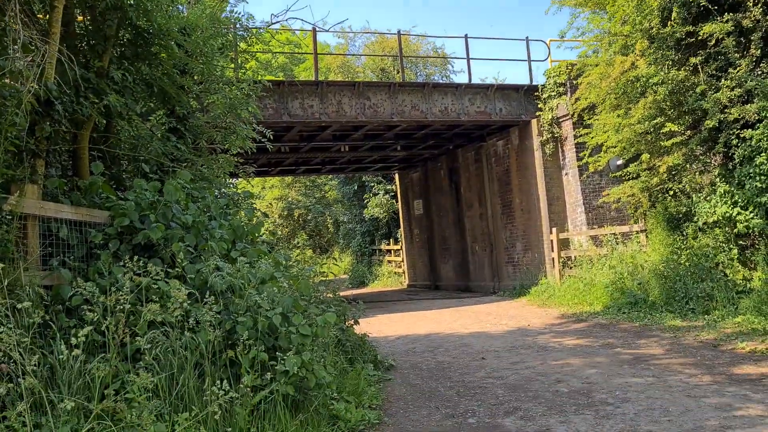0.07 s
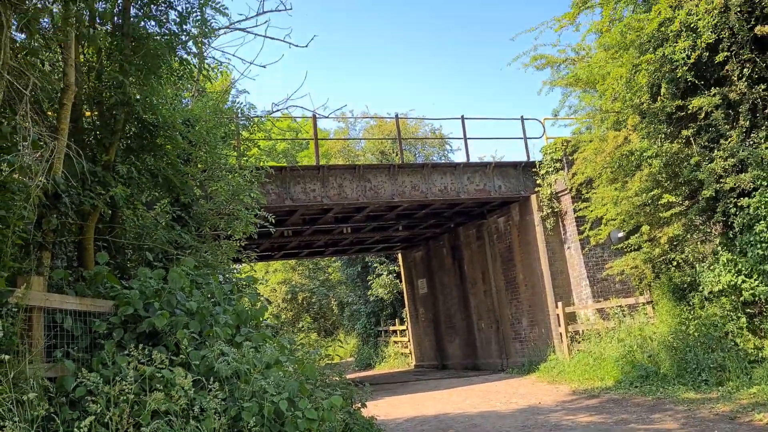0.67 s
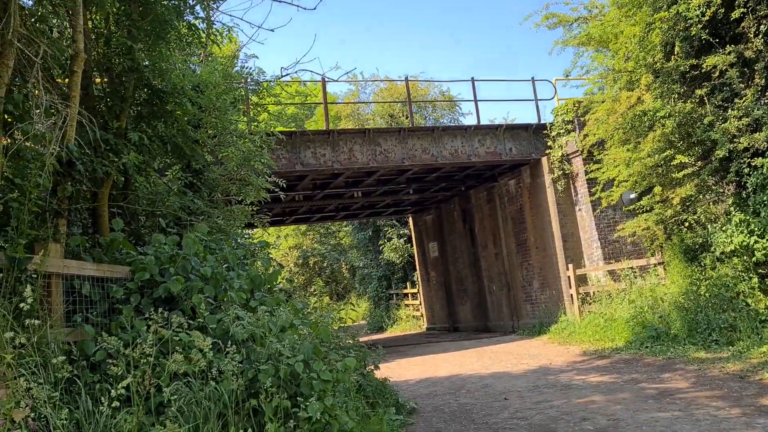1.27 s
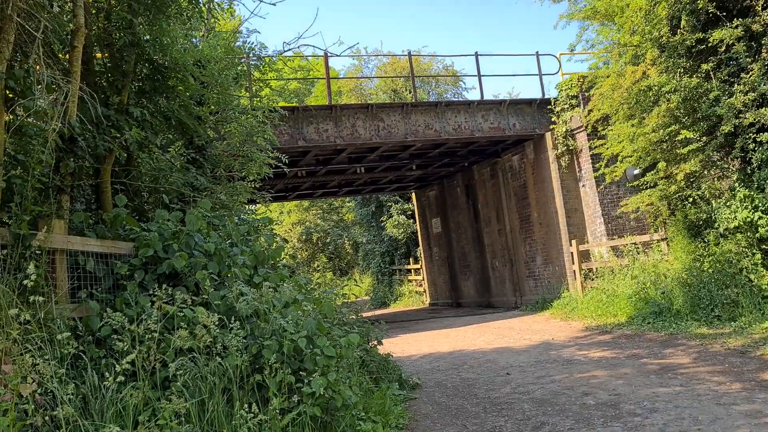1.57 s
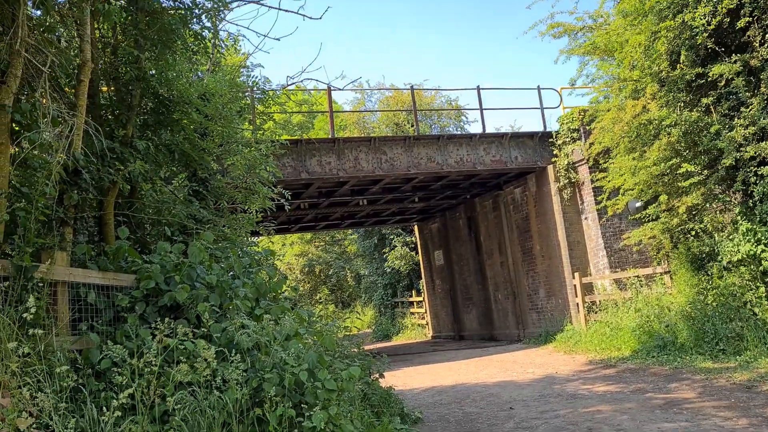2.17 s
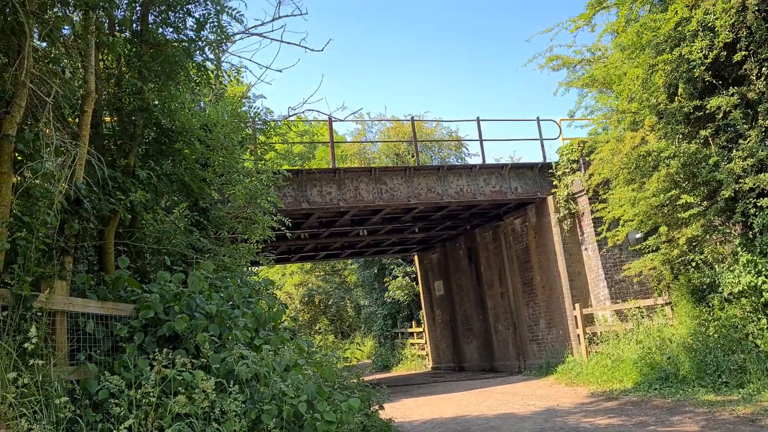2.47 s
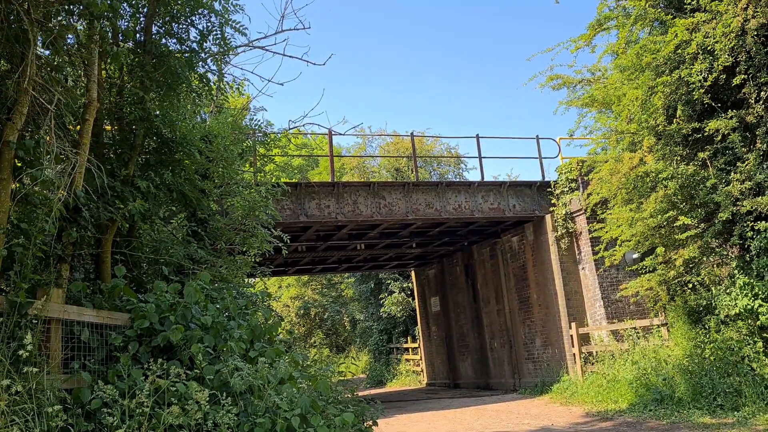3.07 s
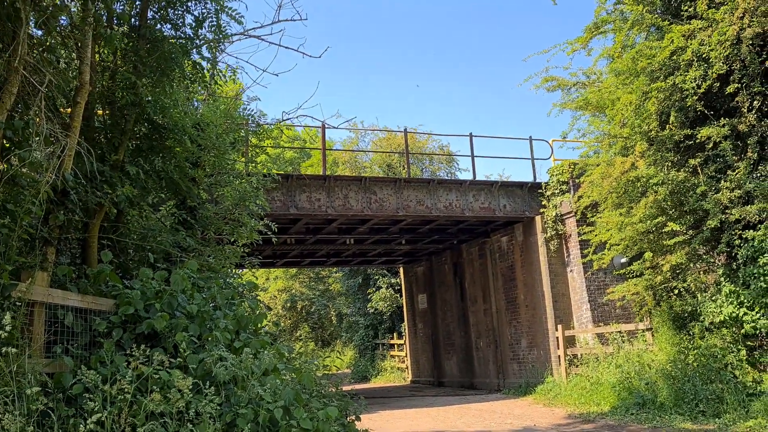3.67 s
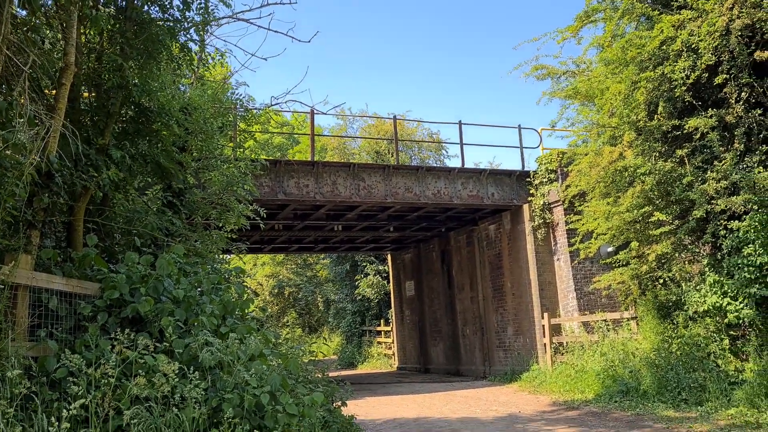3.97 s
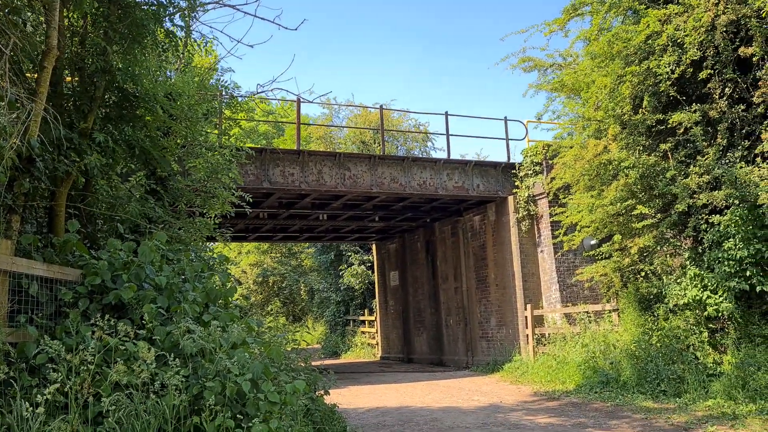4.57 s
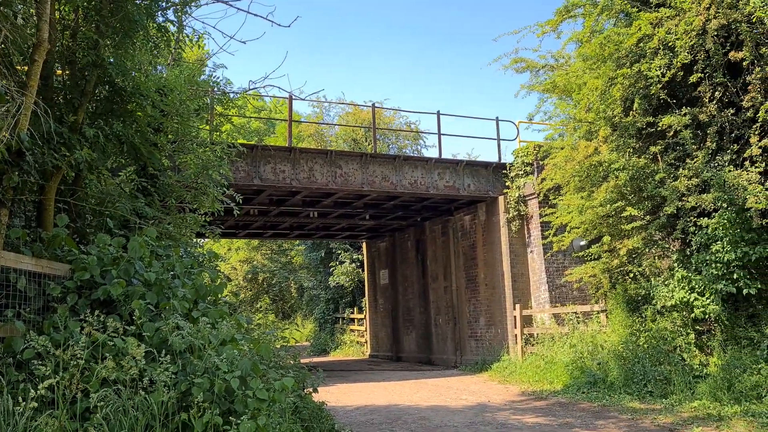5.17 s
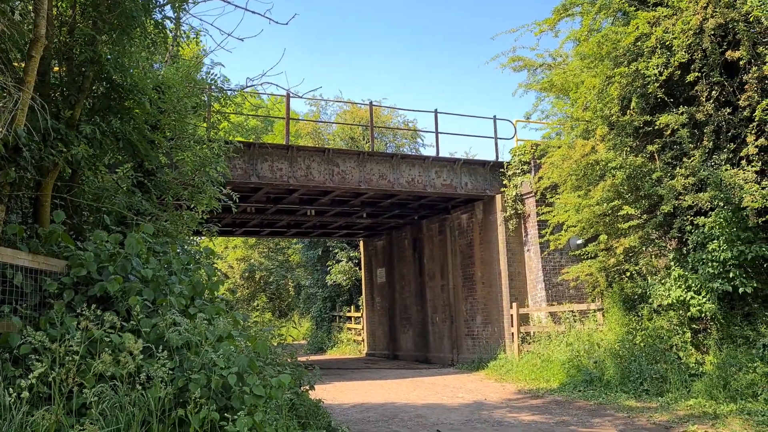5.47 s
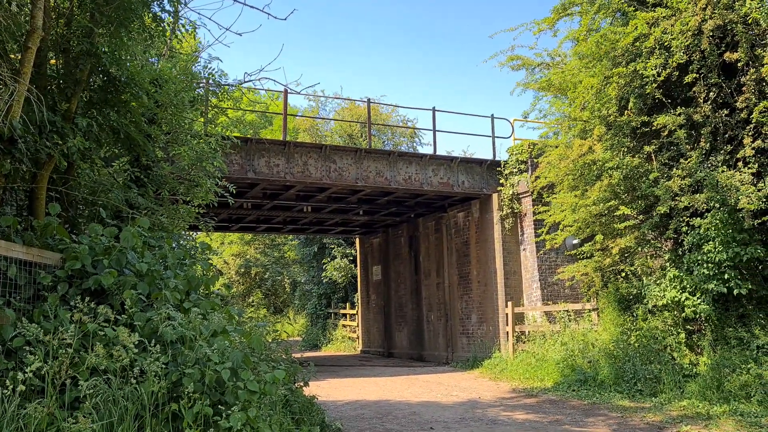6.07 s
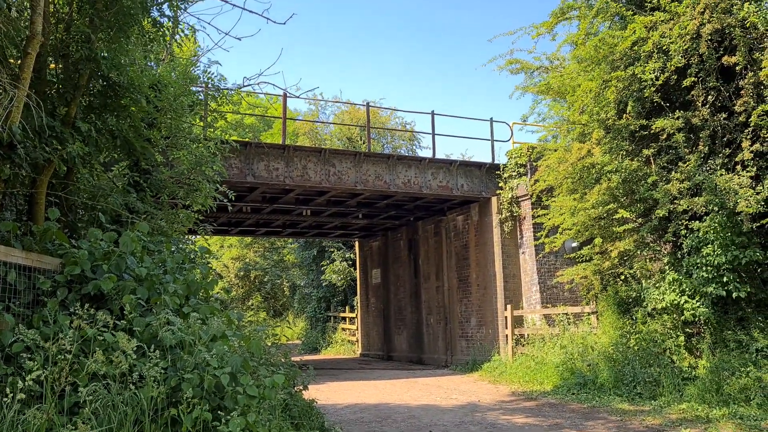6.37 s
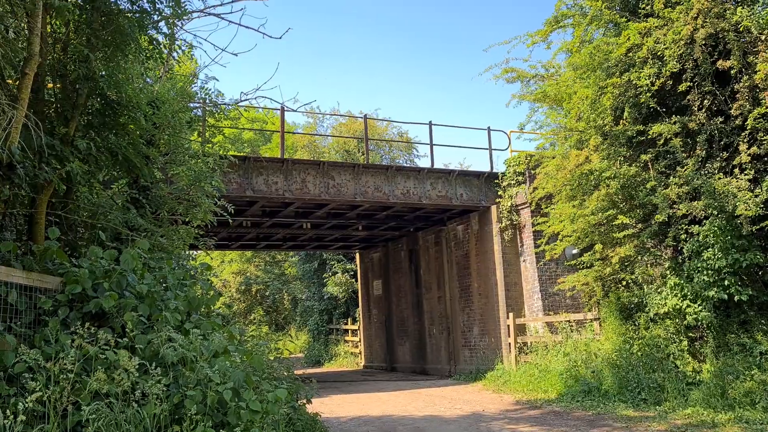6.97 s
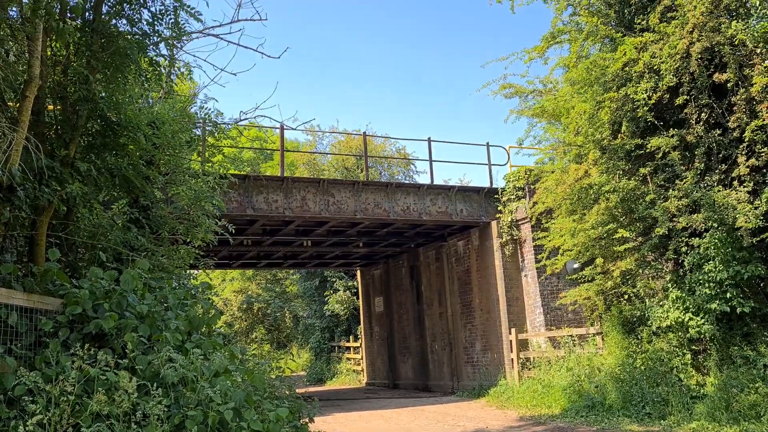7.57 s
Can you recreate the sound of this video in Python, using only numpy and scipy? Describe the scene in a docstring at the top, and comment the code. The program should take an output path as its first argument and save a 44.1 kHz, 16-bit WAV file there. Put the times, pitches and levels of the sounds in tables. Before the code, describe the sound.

A blackbird warbles and a wren answers with thin whistles and a trill, over distant traffic rumble and a light breeze.

```python
"""Birdsong on a country path

Two closely spaced microphones stand near a railway bridge. A blackbird in a tree on the right warbles
one phrase; a wren answers from the hedge with thin whistles, a loud trill and a high last note.
Another bird sings far off. Trunks, leaves and the bridge scatter the song. Distant traffic rumbles
under a soft rush of air, a light breeze buffets the microphones and grit shifts under a shoe."""
import sys
import numpy as np
from scipy import signal
from scipy.fft import rfft, irfft, next_fast_len
from scipy.io import wavfile

SR = 44100
rng = np.random.default_rng(int(sys.argv[2]) if len(sys.argv) > 2 else 0)


def digitize_waveform(pressure):
    """Quantize a signal to 16-bit integers and store it at the path in sys.argv[1].

    Rows of a 2-D input are taken as channels; values are limited to [-1, 1].
    """
    field = np.atleast_2d(pressure).T
    bounded = np.clip(field, -1, 1)
    quanta = np.round(bounded * 32767).astype(np.int16)
    wavfile.write(sys.argv[1], SR, quanta)


N = 344862
TIME = np.arange(N) / SR


def from_db(db):
    """Decibels to gain."""
    return 10 ** (np.asarray(db) / 20)


def rms_one(x):
    """Scale to unit power."""
    return x / np.sqrt(np.mean(x ** 2) + 1e-20)


def at_hz(points, hz, outside=None):
    """Read a table on a log-frequency axis."""
    known, values = np.transpose(points)
    return np.interp(np.log(hz), np.log(known), values, left=outside, right=outside)


def over_time(points):
    """Join (time, value) points with straight lines."""
    return np.interp(TIME, *np.transpose(points))


def bump(at_s, width_s):
    """A smooth rise and fall of height 1 around a moment."""
    return np.exp(-((TIME - at_s) / width_s) ** 2)


def rolloff(x, hz, kind="low", order=2):
    """A gentle low-pass or high-pass."""
    return signal.sosfilt(signal.butter(order, hz, kind, fs=SR, output="sos"), x)


def coloured(spectrum, channels=2):
    """Unrelated noises with the given spectrum and nothing beyond its ends."""
    hz = np.maximum(np.fft.rfftfreq(N, 1 / SR), 1)
    gain = from_db(at_hz(spectrum, hz, outside=-200))
    return rms_one(irfft(rfft(rng.standard_normal((channels, N))) * gain, N))


def drift(rate_hz):
    """Smooth random wandering of spread 1."""
    return rms_one(rolloff(rng.standard_normal(N), rate_hz))


def from_right(x, lag_ms, right_db):
    """A sound from the right reaches the left microphone later, and weaker by right_db."""
    size = next_fast_len(N + 100)
    khz = np.fft.rfftfreq(size, 1000 / SR)
    late = irfft(rfft(x, size) * np.exp(-2j * np.pi * khz * lag_ms), size)[:N]
    return np.array([late, x]) * rms_one(from_db([[0], [right_db]]))


def traffic():
    """Far traffic rumbles from the right and faintly all round, with one slow swell and brief surges."""
    # the rumble's spectrum: (frequency [Hz], density [dB])
    spectrum = [(12, -38.5), (20, -10.5), (70, 4), (90, 0), (135, -15), (170, -25), (220, -41), (370, -120)]
    # its slow swell and ebb: (time [s], level [dB])
    swell = [(0, -54), (.7, -55.5), (3.4, -53.5), (4.3, -51), (5.4, -49), (6.6, -55), (7.82, -55.5)]
    # surges on top: (time [s], rise [dB])
    surges = [(.04, 5), (.24, 6), (3.61, 2.5), (3.72, 4.5), (4.14, 9)]
    level_db = over_time(swell) + sum(db * bump(at_s, width_s=.048) for at_s, db in surges)
    direct = from_right(coloured(spectrum, channels=1)[0], lag_ms=.22, right_db=1.4)
    diffuse = from_db(-16.5) * coloured(spectrum)
    return from_db(level_db) * rms_one(direct + diffuse)


def rush():
    """Leaves all round and a far road on the right; only long waves reach both microphones alike."""
    # the rush's spectrum: (frequency [Hz], density [dB])
    spectrum = [(76, 6), (130, -0.5), (173, -3), (216, -3.5), (260, -4.5), (397, -2.5), (637, -6),
                (1020, -5.5), (2270, -17), (3700, -18), (4610, -21), (4850, -25.5), (5280, -25),
                (6690, -23.5), (7400, -27.5), (9620, -59.5), (16300, -120)]
    # its lean across the pair: (frequency [Hz], left minus right [dB])
    balance = [(60, -4.5), (100, 0), (170, -2.5), (290, -1), (500, -1.5), (840, -3), (1430, -2.5),
               (2430, -6.5), (4130, -9), (7000, -5.5)]
    # its almost steady strength: (time [s], level [dB])
    level = [(0, -54), (4.3, -52.5), (7.82, -54.5)]
    spacing_ms, road_db, road_corner_hz = .43, -1, 1620
    hz = np.maximum(np.fft.rfftfreq(N, 1 / SR), 1)
    alike = np.sinc(2 * hz * spacing_ms / 1000)
    mid, side = rfft(coloured(spectrum))
    leaves = np.sqrt((1 + alike) / 2) * mid + np.sqrt((1 - alike) / 2) * side * [[1], [-1]]
    road = rfft(from_right(coloured(spectrum, channels=1)[0], spacing_ms, right_db=0))
    road_gain = from_db(road_db) / np.sqrt(1 + (hz / road_corner_hz) ** 2)
    both = (leaves + road_gain * road) / np.sqrt(1 + road_gain ** 2)
    lean = from_db(at_hz(balance, hz) * [[.5], [-.5]])
    return from_db(over_time(level)) * rms_one(irfft(both * lean, N))


def breeze():
    """Light air buffets each microphone on its own."""
    # the breeze freshens midway: (time [s], level [dB])
    level = [(0, -67), (2.7, -64.5), (4.8, -60), (6.7, -59.5), (7.82, -61)]
    return from_db(over_time(level)) * coloured([(15, -7), (30, -7.5), (60, -22.5), (150, -24)])


def hiss():
    """A faint high hiss, a little stronger on the right."""
    # the hiss's spectrum: (frequency [Hz], density [dB])
    spectrum = [(7000, -18), (7700, -10), (8700, -4.5), (9800, 2), (13000, 1), (16500, -6)]
    return from_db([[-82.2], [-79]]) * coloured(spectrum)


def scuffs():
    """Grit shifts under a shoe: a brief scrape and two dull ticks."""
    # shifts of the grit: (time [s], half length [s], level before dulling [dB], dull above [Hz])
    shifts = [(.342, .020, -57, 15000), (1.3045, .0016, -47, 3000), (3.081, .001, -51, 6000)]
    grit = coloured([(300, -2), (1200, 0), (4000, -6), (7400, -14), (8200, -27), (15000, -27)])
    grit *= from_db(2 * drift(300))
    return sum(from_db(db) * bump(at_s, half_s) * rolloff(grit, top_hz, order=1)
               for at_s, half_s, db, top_hz in shifts)


def sing(notes, waver, rasp_depth, rasp_hz, rise_s, fall_s, second_db, third_db):
    """Each note is a near-pure whistle through three pitches; fast flutter of the syrinx makes it rasp."""
    song = np.zeros(N)
    wander, flutter = drift(79), drift(rasp_hz)
    for start, length, first, middle, last, db, rasp in notes:
        at = np.flatnonzero((TIME >= start) & (TIME < start + length))
        progress = (TIME[at] - start) / length
        glide_hz = np.polyval(np.polyfit([0, .5, 1], [first, middle, last], 2), progress)
        pitch_hz = glide_hz * (1 + waver * wander[at] + rasp_depth * rasp * flutter[at])
        phase = 2 * np.pi * np.cumsum(pitch_hz) / SR
        # air pressure builds and drops
        rise = np.clip(progress / min(rise_s / length, .5), 0, 1)
        fall = np.clip((1 - progress) / min(fall_s / length, 1 / 3), 0, 1)
        envelope = rise * np.sin(np.pi / 2 * fall) ** 2
        amplitude = np.sqrt(2) * from_db(db + 2 * rasp * flutter[at])
        # the octave grows as the pitch is pushed up
        second = from_db(second_db) * (glide_hz / 6000) ** 3 * np.sin(2 * phase)
        third = from_db(third_db) * np.sin(3 * phase)
        song[at] += amplitude * envelope * (np.sin(phase) + second + third)
    return song


def scatter(db, t60_s):
    """A second of dense reflections at each microphone, dying by 60 dB in t60_s."""
    t = TIME[:SR]
    envelope = from_db(-60 * t / t60_s) * (1 - np.exp(-t / .0013))
    return from_db(db) * rms_one(rng.standard_normal((2, SR)) * envelope) / np.sqrt(SR)


def woodland(song, echoes, foliage, trees, shade_hz, scatter_hz, lag_ms, right_db, echo_right_db):
    """Direct song, distinct echoes, quick scatter from foliage and a longer tail from the trees beyond."""
    # leaves take short waves out of the direct path and scatter them
    direct = from_right(rolloff(song, shade_hz), lag_ms, right_db)
    response = trees + rolloff(foliage, scatter_hz, "high")
    for delay_s, db in echoes:
        for side in range(2):
            response[side, int((delay_s + rng.uniform(0, .001)) * SR)] += from_db(db)
    reflected = signal.fftconvolve(song[None], response, axes=1)[:, :N]
    return direct + reflected * rms_one(from_db([[0], [echo_right_db]]))


def far_bird():
    """Distant song reaches the microphones largely as scattered sound."""
    # far notes: (start [s], length [s], first [Hz], middle [Hz], last [Hz], effort [dB], rasp [0-1])
    notes = [ (.77, 0.14, 5100, 4950, 5020, -71, .1), (1.90, 0.11, 2323, 2290, 2180, -66, .23),
             (4.86, 0.11, 4880, 4980, 4990, -68.5, .06), (5.62, 0.081, 1807, 1730, 1780, -67, .6),
             (5.76, .30, 2095, 2027, 1995, -71.5, 0.79), (6.42, 0.16, 2174, 2080, 2020, -62.5, .46),
             (6.44, 0.11, 1800, 1785, 1680, -64, .84), (6.77, 0.12, 2280, 2196, 2270, -63, .31),
             (6.91, 0.037, 2530, 2560, 2500, -53, .1), (6.94, 0.1, 2267, 2324, 2365, -56, 0.11),
             (7.04, 0.103, 2350, 2317, 2237, -51.5, .13), (7.30, .089, 2750, 2373, 1760, -60, 1),
             (7.39, 0.069, 2430, 2624, 2580, -52, .5)]
    song = sing(notes, waver=.0044, rasp_depth=.054, rasp_hz=199,
                rise_s=.019, fall_s=.0091, second_db=-38, third_db=-57)
    return from_db(-2) * woodland(
        song, echoes=[], foliage=scatter(db=2.5, t60_s=.18), trees=scatter(db=4, t60_s=.74),
        shade_hz=9050, scatter_hz=1200, lag_ms=.41, right_db=5, echo_right_db=4)


def wren_trill():
    """One syllable eight times in strict time, swelling a little and sinking slightly in pitch."""
    # the syllable's soft lead-in, top pip and steep fall:
    # (offset [s], length [s], first [Hz], middle [Hz], last [Hz], relative effort [dB], rasp [0-1])
    syllable = [(-.034, .027, 4436, 4620, 4360, -15.5, 1), (-.005, 0.014, 5650, 5850, 5660, 1.5, 0.05),
                (.012, .026, 5850, 4590, 4086, -1.06, 0.28)]
    start_s, period_s, swell_s, sag_per_s = 6.6262, .11906, .19, .031
    notes = []
    for elapsed in np.arange(8) * period_s:
        effort_db = -28.5 - 2 * np.exp(-elapsed / swell_s)
        for offset, length, *pitches, db, rasp in syllable:
            tuning = 1 - sag_per_s * elapsed + rng.normal(0, .0074, size=3)
            notes.append((start_s + elapsed + offset, length, *(pitches * tuning), effort_db + db, rasp))
    return sing(notes, waver=.007, rasp_depth=.04, rasp_hz=400,
                rise_s=.004, fall_s=.004, second_db=-42, third_db=-42)


def wren():
    """Thin whistles, a trill and a high last note from deep in the hedge."""
    # single notes: (start [s], length [s], first [Hz], middle [Hz], last [Hz], effort [dB], rasp [0-1])
    notes = [ (5.58, 0.057, 5250, 5050, 4900, -68, .3), (5.688, 0.027, 4000, 4250, 4500, -53, .3),
             (5.768, 0.032, 6260, 5450, 5100, -60.5, .9), (5.825, .029, 5230, 4740, 4230, -54, 1),
             (5.938, 0.11, 6090, 6630, 6400, -46.5, .15), (6.050, 0.041, 5620, 5030, 4250, -55, 1),
             (6.080, 0.017, 4540, 4220, 4320, -45, .08), (6.162, 0.095, 6090, 6660, 6590, -40.5, 0.2),
             (6.302, 0.147, 5330, 4943, 4860, -42.5, 0.047), (6.462, 0.1, 5750, 6240, 6160, -36, .05),
             (7.555, .175, 7260, 7310, 7260, -35, 0.041)]
    # echoes off the bridge and trunks: (delay [s], gain [dB])
    echoes = [(.0105, -6), (.029, -9), (.046, -14)]
    whistles = sing(notes, waver=.0023, rasp_depth=.03, rasp_hz=245,
                    rise_s=.012, fall_s=.025, second_db=-42, third_db=-69)
    song = whistles + wren_trill()
    return from_db(-7) * woodland(
        song, echoes, foliage=scatter(db=1.5, t60_s=.31), trees=scatter(db=-2.5, t60_s=.51),
        shade_hz=12000, scatter_hz=1990, lag_ms=.39, right_db=1.5, echo_right_db=3.3)


def blackbird():
    """Fluty notes from a tree on the right; the bird's throat favours the middle of its range."""
    # the song: (start [s], length [s], first [Hz], middle [Hz], last [Hz], effort [dB], rasp [0-1])
    notes = [ (1.344, 0.017, 2500, 3090, 3100, -43.5, 0), (1.392, 0.063, 4170, 4080, 3960, -50.5, 0.44),
             (1.511, 0.037, 2450, 2686, 2720, -38.5, 0.02), (1.597, 0.094, 3140, 2947, 2785, -45.5, 0.2),
             (1.820, 0.045, 4430, 3880, 3140, -45.5, .34), (1.932, 0.049, 4700, 4185, 3680, -42, .2),
             (2.125, 0.028, 3064, 3490, 3900, -50.5, .4), (2.153, 0.014, 4120, 4150, 4200, -37, 0.45),
             (2.212, .026, 4500, 4100, 3400, -41.5, .26), (2.245, .048, 3410, 3304, 3120, -41.5, 0.74),
             (2.388, 0.015, 6300, 5860, 5360, -40, 1), (2.458, .014, 5600, 4900, 4800, -41.5, 0.6),
             (2.572, .070, 3270, 2646, 2880, -40, 0.58), (2.668, 0.05, 2840, 3400, 3450, -38.5, 0),
             (2.932, 0.022, 6250, 4800, 4270, -37.5, 0.9), (2.948, 0.069, 4400, 3670, 3640, -41, 0.65),
             (3.015, .082, 3600, 3920, 3640, -48.5, 0.05), (3.143, 0.026, 2940, 3230, 3270, -36, 0.2),
             (3.214, 0.016, 4680, 4900, 6000, -41, 1), (3.287, 0.068, 3695, 3113, 3170, -38, 0.17),
             (3.352, 0.045, 3510, 3475, 3610, -35.5, 0), (3.468, 0.053, 2780, 2644, 2870, -38, 0.1),
             (3.515, .032, 3110, 2390, 2210, -47, 1), (3.555, 0.089, 2444, 2466, 2425, -43, 0),
             (3.712, .032, 2645, 2780, 2980, -41.5, 0.47), (3.797, .085, 4850, 4340, 3450, -42, 0.34),
             (3.868, 0.093, 3460, 3233, 3284, -38, 0.09), (3.992, .022, 3540, 3630, 3600, -37.5, .1),
             (4.168, 0.054, 2360, 2820, 2920, -38, 0.35), (4.212, 0.057, 2775, 2680, 2680, -36.5, 0.16),
             (4.287, 0.031, 3180, 3240, 3220, -34, 0.17), (4.412, .027, 3800, 3790, 3650, -54, .1),
             (4.432, 0.097, 3033, 3025, 2970, -40.5, 0.28), (4.526, 0.065, 2840, 2490, 2900, -45, 0.27),
             (4.672, 0.067, 3080, 3125, 3245, -40, 0.07), (4.742, 0.073, 3500, 2982, 2900, -37, 0.11),
             (4.890, 0.15, 2100, 2534, 2628, -44.5, 0.2), (7.797, 0.051, 3190, 3450, 3320, -37, 0)]
    # echoes off the bridge and trunks: (delay [s], gain [dB])
    echoes = [(.012, -11), (0.05, -18.5), (.098, -33)]
    throat_hz, throat_width_hz = 3100, 1050
    whistles = sing(notes, waver=.004, rasp_depth=.06, rasp_hz=350,
                    rise_s=.018, fall_s=.011, second_db=-30, third_db=-46)
    song = signal.lfilter(*signal.iirpeak(throat_hz, throat_hz / throat_width_hz, fs=SR), whistles)
    return woodland(
        song, echoes, foliage=scatter(db=-1, t60_s=.26), trees=scatter(db=-10.5, t60_s=.58),
        shade_hz=3700, scatter_hz=4500, lag_ms=.45, right_db=9, echo_right_db=7)


def scene():
    """Three singers over the outdoor background, heard from the path."""
    return traffic() + rush() + breeze() + hiss() + scuffs() + far_bird() + wren() + blackbird()


def record(dry):
    """The recorder cuts the top steeply above 15.7 kHz."""
    return signal.sosfilt(signal.ellip(10, .1, 80, 15700, fs=SR, output="sos"), dry)


dry = scene()
out = record(dry)
digitize_waveform(out)
```